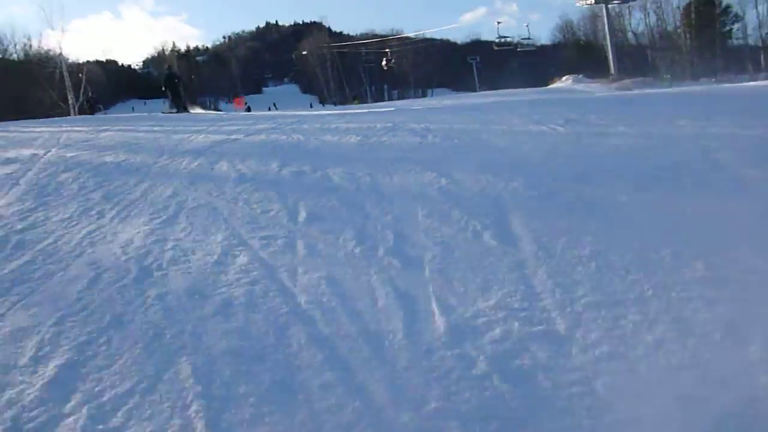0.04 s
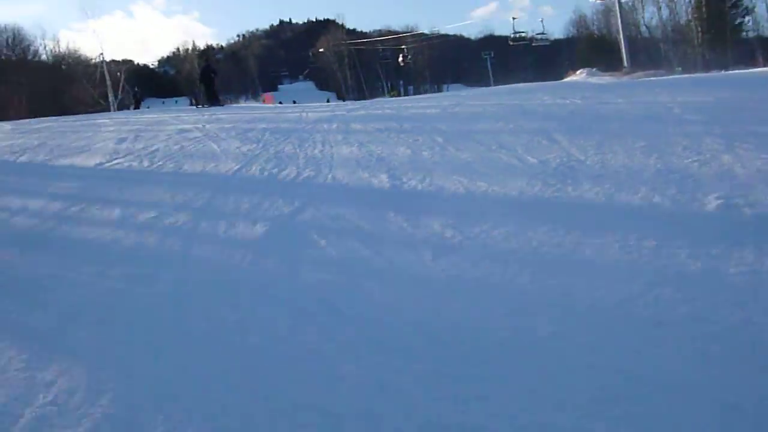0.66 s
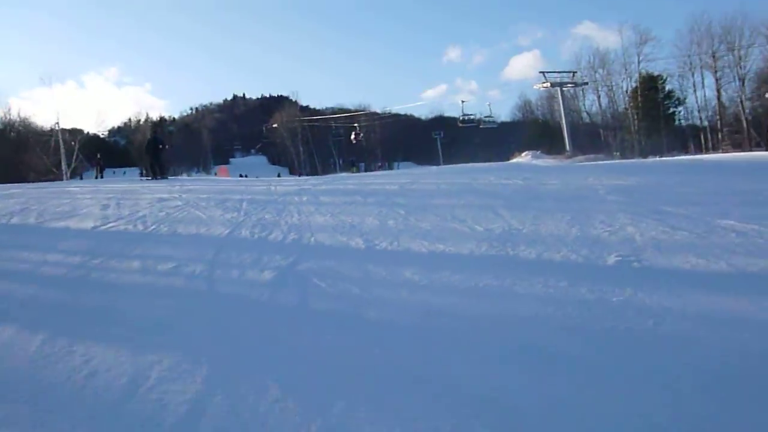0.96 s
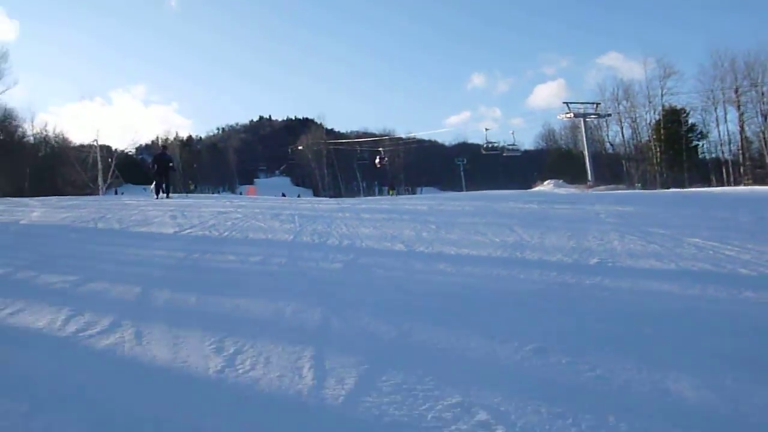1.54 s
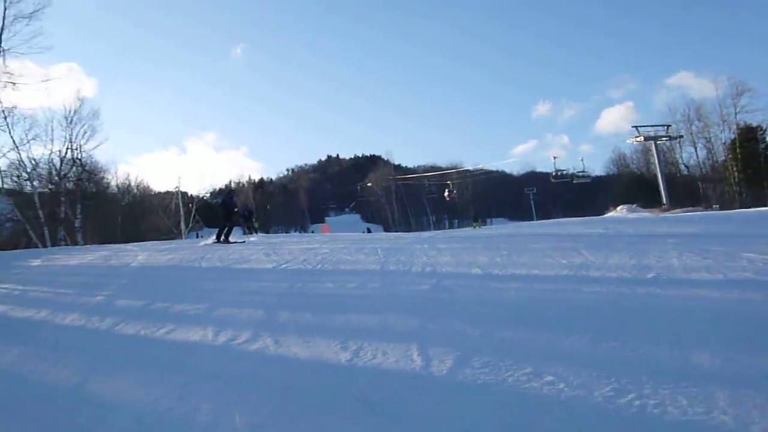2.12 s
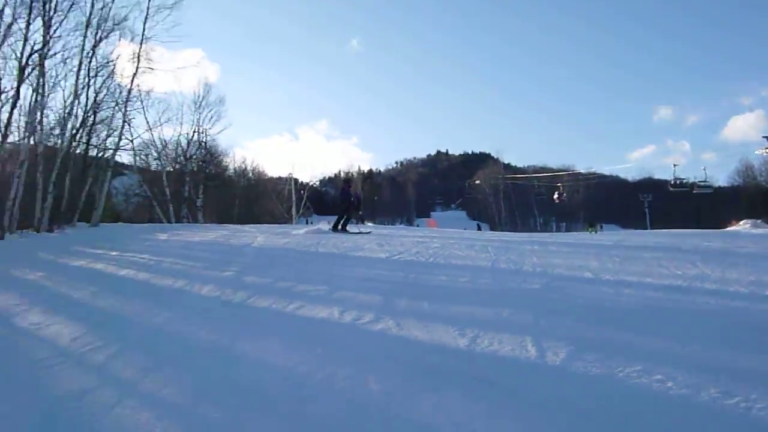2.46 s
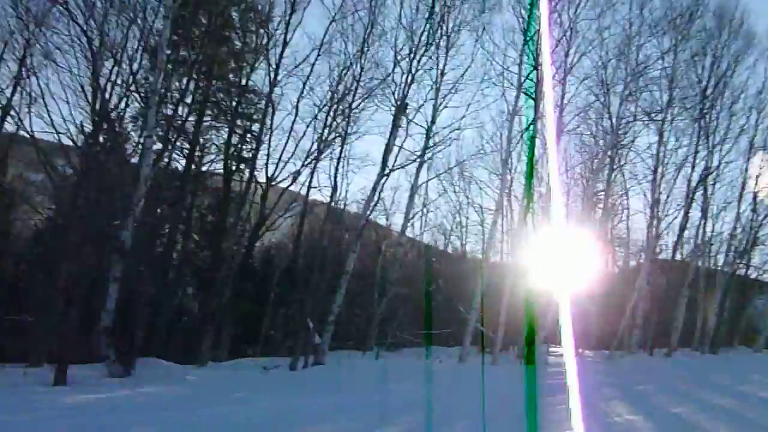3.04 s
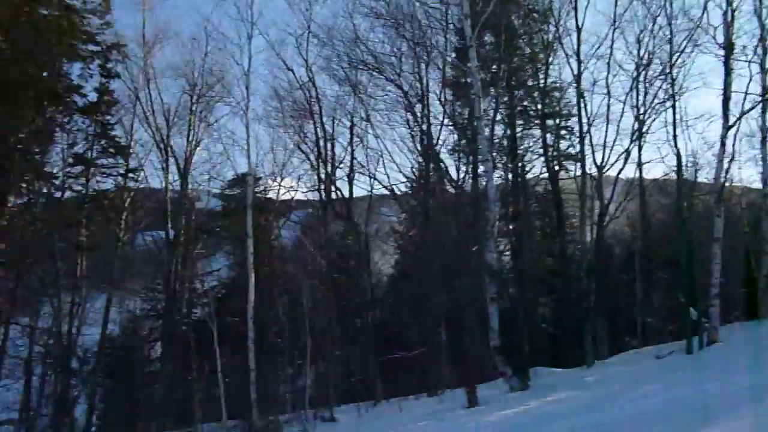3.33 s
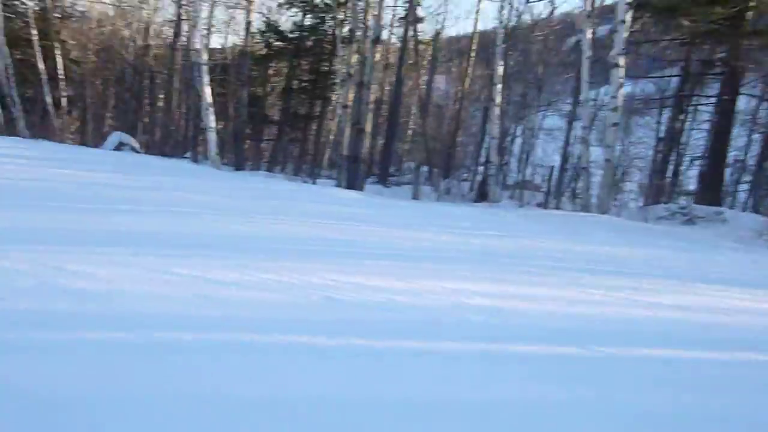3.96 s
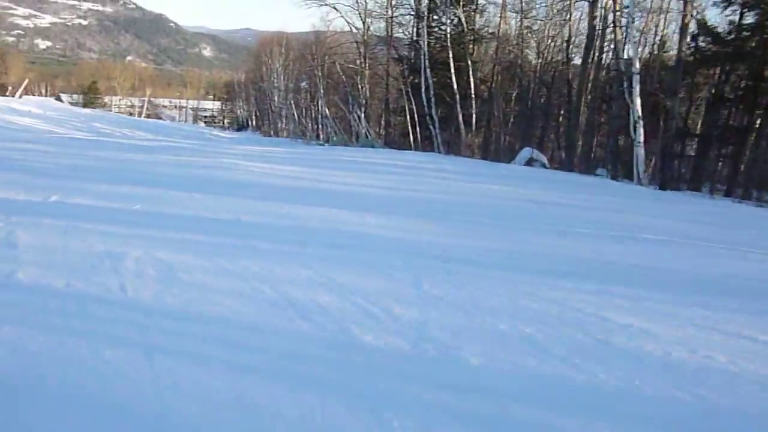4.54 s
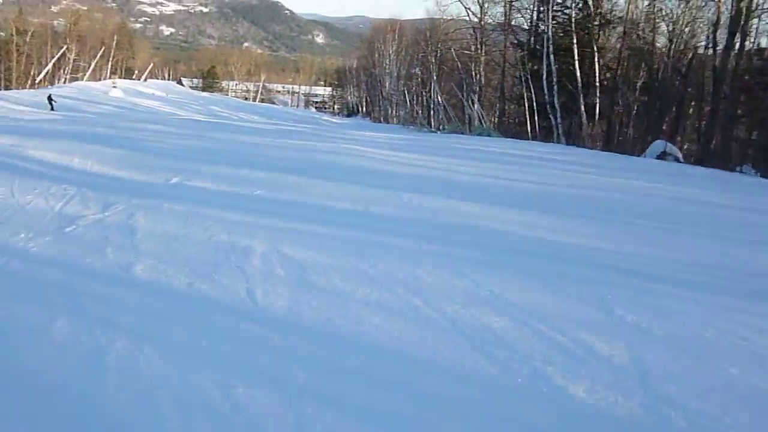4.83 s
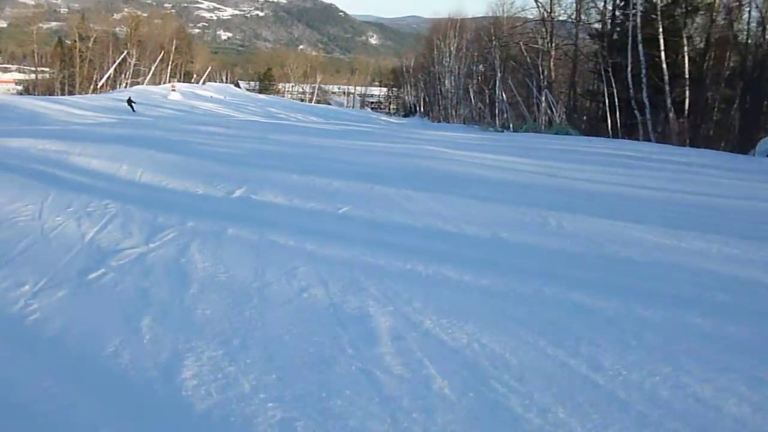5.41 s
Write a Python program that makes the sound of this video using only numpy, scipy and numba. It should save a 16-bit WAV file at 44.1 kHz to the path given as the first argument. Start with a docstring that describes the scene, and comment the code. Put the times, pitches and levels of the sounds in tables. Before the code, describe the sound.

A snowboard is already running fast over groomed snow, heard close from a microphone the rider carries, outdoors with no echo and slightly dull treble. For the first two and a half seconds, ridges drum steadily against the board and lumps give short low thuds, while the edge scrapes, crunches through crust and throws soft hisses of powder. A brief gritty rasp comes at about 1.3 seconds. From about 2.5 to 3.4 seconds the board glides more quietly. At about 3.6 seconds it bites into a turn with a louder, coarse scrape. From about 4.4 seconds to the end at 5.6, it skips, lands with hollow rattles and chatters over hard patches in quick runs of knocks, strongest around 5 seconds. Wind rumbles on the microphone throughout, with gusts near 0.2, 2.7 and 3.3 seconds and the heaviest around 4 seconds.

```python
"""On a groomed ski slope, a snowboard runs fast downhill, heard from a camera the rider carries.
Ridges of packed snow drum on the board and lumps thump it. The steel edge sticks and slips in a scrape,
crunches through crust and throws a hiss of powder. After a quiet glide the board bites into a turn, then
skips, lands and chatters over hard patches. Underneath, wind buffets the microphone."""
import sys
import numpy as np
from scipy import signal
from scipy.fft import rfft, irfft, next_fast_len
from scipy.io import wavfile
from scipy.ndimage import uniform_filter1d, map_coordinates
from numba import njit

SR = 44100
rng = np.random.default_rng(int(sys.argv[2]) if len(sys.argv) > 2 else 0)


def to_wav(sig):
    """Store sig (one row per channel, or 1-D mono) as 16-bit WAV at the path in sys.argv[1].

    Samples outside -1..1 are clipped; the rate is SR.
    """
    pcm = np.clip(np.atleast_2d(sig), -1, 1) * 32767
    pcm = np.round(pcm).astype(np.int16)
    wavfile.write(sys.argv[1], SR, pcm.T)  # frames by channels


N = 246210

# how far the board tips onto its edge: t/s, lean/0-1
LEAN = [(0, 0.58), (0.7, 0.24), (1.3, 0.47), (2.0, 0.52), (2.4, 0.27), (2.7, 0.3), (3.3, 0.63),
        (3.65, 0.85), (4.2, 0.88), (4.6, 0.87), (5.58, 0.91)]
# how hard the rider loads the board, driving scrape, crunch and powder: t/s, load/dB
LOAD = [(0.0, 1.5), (0.35, -1.8), (0.45, 1.5), (0.92, 0.5), (1.01, -1.5), (1.68, -2.5), (1.97, 0.2),
        (2.23, -1.9), (2.39, 3), (2.54, -5), (2.81, -5), (2.98, 0.2), (3.38, -4.5), (3.64, 3.5),
        (4.37, 1.5), (4.69, 2), (5.2, -2), (5.58, 1.2)]
# the board skips off a ridge and goes light: t/s, dip of the drumming/dB
HOPS = [(1.1, -2.5), (1.21, -3), (2.075, -1.5), (2.49, -3), (3.875, -4), (4.275, -6), (4.47, -1.5),
        (4.815, -5), (4.91, -0.5), (5.12, -8), (5.245, -9), (5.47, -6.5)]
# roughness of the groomed snow, the fader of the drumming: t/s, level/dB
ROUGHNESS = [(0.0, -25.5), (0.46, -25.5), (0.56, -24), (1.1, -25), (1.49, -26), (1.65, -30.5), (1.84, -25),
             (2.29, -28), (2.36, -24), (2.8, -32.5), (3.21, -27), (3.55, -31), (4.16, -30), (4.19, -27),
             (4.61, -32), (4.73, -24.5), (4.85, -33.5), (5.58, -35)]
# lumps that thump the board: t/s, level/dB, f/Hz, t60/s
BUMPS = [(0.028, -3.5, 265, 0.027), (0.156, -10, 298, .05), (.172, -11, 260, 0.048),
         (0.321, -9.5, 286, 0.14), (.468, -14, 231, 0.036), (.513, -6, 328, 0.062),
         (0.565, -5.5, 268, 0.067), (.617, -5, 275, 0.017), (0.675, -14, 273, 0.066),
         (0.734, -11, 337, .035), (.762, -15, 345, 0.044), (0.843, -9, 316, 0.026), (0.862, -7, 320, 0.025),
         (0.905, -8.5, 290, 0.055), (.95, -9, 305, 0.053), (1.04, -6.5, 263, 0.022),
         (1.14, -11, 298, 0.016), (1.165, -9, 240, 0.04), (1.467, -11, 257, 0.056),
         (1.849, -10.5, 260, 0.065), (1.923, -5, 327, 0.019), (2.01, -7, 292, 0.03),
         (2.395, -12.5, 380, 0.052), (2.456, -5.5, 263, 0.021), (2.55, -11, 348, 0.015),
         (2.963, -11, 283, 0.014), (3.157, -12.5, 324, 0.045), (3.189, -15, 302, 0.051),
         (3.22, -8, 303, 0.013), (3.269, -6.5, 318, 0.017), (3.321, -10.5, 192, 0.01),
         (3.69, -10, 310, 0.017), (3.817, -13, 250, 0.028), (3.942, -13.5, 310, 0.023),
         (4.184, -7, 218, 0.045), (4.227, -7.5, 218, 0.045), (4.315, -9.5, 247, 0.018),
         (4.367, -7.5, 276, 0.024), (4.411, -14, 271, 0.022), (4.767, -9, 274, 0.015),
         (4.78, -13, 290, 0.014), (4.98, -16, 248, .06), (5.045, -16, 172, .07), (5.181, -17, 304, 0.075),
         (5.283, -17.5, 159, 0.051), (5.551, -16.5, 271, 0.045)]
# modes of board and bindings: f/Hz, width/Hz, level running flat/dB, boost at full lean/dB
BOARD_MODES = [(154, 69, -12.5, 11.5), (463, 213, -5.5, 4), (610, 186, -4.5, 5.5), (883.5, 156, -1, 1.5),
               (1233, 136, -5.5, 1), (1460, 640, -12, -3)]
# the edge skids sideways: t/s, half-length/s, scrape boost/dB, grit level/dB
SKIDS = [(.55, 0.04, -0.5, -46), (1.281, .007, 6, -41), (1.313, 0.0087, 5, -38.5), (2.342, 0.022, 2, -46),
         (2.432, 0.026, 2, -50), (3.74, 0.14, 0.5, -39.5), (4.05, .12, 0.5, -44.5), (4.204, 0.022, -1, -40),
         (4.644, .012, 2, -45), (5.403, .02, 0, -46)]
# the edge catches on hard snow: t/s, length/s, level/dB, f/Hz, t60/s
CATCHES = [(0.119, .003, -13.5, 860, 0.016), (0.594, .003, -16, 860, .014), (0.983, .003, -13, 700, 0.018),
           (1.303, .022, -14, 980, 0.0085), (2.417, .003, -21, 800, 0.016), (2.549, .003, -14, 460, 0.017),
           (3.609, .003, -13, 990, 0.017), (3.666, .003, -16, 905, 0.024), (3.815, .02, -15.5, 555, 0.02),
           (3.885, .003, -15.5, 860, 0.02), (4.277, .003, -22, 980, .018), (4.461, .003, -10, 930, 0.015),
           (4.638, .003, -15.5, 985, 0.019), (4.685, .042, -17, 830, 0.017), (4.744, .014, -19, 774, 0.014),
           (4.843, .003, -13, 565, 0.01), (4.948, .012, -18.5, 892, 0.032), (5.029, .003, -15, 495, .008),
           (5.034, .01, -12, 570, 0.007), (5.048, .003, -6, 586, 0.023), (5.058, .021, -11, 598, .026),
           (5.292, .02, -16.5, 700, .01), (5.389, .02, -20.5, 880, 0.035), (5.415, .003, -7.5, 800, 0.017),
           (5.425, .003, -19, 900, 0.016), (5.475, .003, -14, 1220, 0.02)]
# the board comes down on hard patches: t/s, length/s, level/dB
LANDINGS = [(4.678, 0.085, -30), (4.837, 0.026, -26.5), (4.935, 0.032, -31.5), (5.025, 0.048, -30),
            (5.283, 0.028, -24)]
# hollow body of a landing: f/Hz, level/dB
LANDING_EQ = [(60, -33), (160, 2), (280, -4), (380, 0.5), (480, -2.5), (590, 2.5), (700, -11), (900, -9.5),
              (1200, -22), (2000, -36), (5000, -60)]
# crustiness of the snow, the fader of the crunch: t/s, level/dB
CRUST = [(0, -43.5), (0.7, -43), (1.5, -41.5), (2.0, -41), (2.55, -47.5), (3.0, -43), (3.35, -43.5),
         (3.8, -43), (4.15, -43), (4.4, -45), (5.58, -43.5)]
# plates of crust snap under the edge: t/s, level/dB, decay/s
CRACKS = [(.508, -42.5, .005), (0.571, -38, 0.0065), (.688, -41, 0.0053), (.85, -42, 0.017),
          (.903, -37, 0.015), (1.282, -38, 0.0046), (1.303, -43, 0.005), (1.315, -43, .007),
          (1.922, -36, 0.0031), (2.641, -44, 0.0046), (2.985, -52, .005), (3.478, -41.5, 0.012),
          (3.608, -43, .008), (3.669, -39, .008), (3.786, -42, 0.011), (3.82, -39, 0.011),
          (4.196, -48, 0.018), (4.522, -34.5, .004), (4.638, -41, 0.0039), (4.753, -43, 0.0032),
          (5.173, -42, .004), (5.476, -39, .003), (5.541, -40, 0.0027)]
# fine crust under a flat board: f/Hz, level/dB
FINE_CRUST_EQ = [(800, -14.5), (1650, 6.5), (2200, -10.5), (2850, 0.5), (3150, -0.5), (3700, 1), (4500, -8),
                 (6000, -15.5), (8000, -34)]
# coarse lumps under a leaning edge: f/Hz, level/dB
COARSE_CRUST_EQ = [(600, -9.5), (1100, 8.5), (1550, 9.5), (2000, 1), (2300, 2), (2800, 0.5), (3600, -7.5),
                   (4600, -18), (8000, -38.5)]
# plumes thrown up from soft patches: t/s, half-length/s, powder boost/dB
PLUMES = [(1.157, 0.036, 4.5), (1.454, 0.18, 1), (1.82, 0.12, 6.5), (2.298, 0.082, 7.5), (2.95, .2, 3),
          (4.2, 0.16, 4.5), (4.638, 0.023, 6), (5.13, 0.023, 4.5), (5.32, 0.32, 4.5)]
# hiss of sprayed powder: f/Hz, level/dB
POWDER_EQ = [(1500, -22.5), (3000, 0), (4200, 6), (5000, 1.5), (5900, 1.5), (7000, -4), (8000, -11.5),
             (9000, -15.5)]
# rasp of hard grit: f/Hz, level/dB
GRIT_EQ = [(800, -17), (1200, 1), (1800, 6), (2400, 0), (3500, -1), (4200, -5.5), (5200, -18.5),
           (8000, -33.5)]
# low wind rumble around 120 Hz; the 12 Hz point adds only inaudible drift: f/Hz, level/dB
LOW_END_EQ = [(12, 2.5), (28, -16), (42, -11), (75, -1.5), (120, 5), (200, -4.5), (400, -23), (1200, -75)]
# gusts on the microphone: t/s, half-length/s, level/dB
GUSTS = [(.24, 0.084, -44.5), (2.655, 0.058, -39.5), (3.27, 0.16, -40.5), (3.627, 0.025, -50),
         (3.988, 0.12, -36), (4.24, 0.045, -35)]
# deeper roar of a gust: f/Hz, level/dB
ROAR_EQ = [(20, -15), (42, -5), (80, -1), (130, 0), (200, -13.5), (400, -33.5), (1200, -80)]
# single eddies that slap the microphone: t/s, level/dB, f/Hz
SLAPS = [(.235, -31, 48), (3.215, -37, 42), (3.319, -32, 55)]


def drumming(flat_hz=295, lean_drop_hz=75, trim_db=0.94):
    """Snow ridges hit the base and keep the board's bending resonance booming, lower as it leans."""
    # the pitch wanders as the length of board on the snow changes
    hz = (flat_hz - lean_drop_hz * curve(LEAN)) * (1 + 0.084 * wander(rate=14))
    ridges = grains(rate=1500, scatter_db=0.5)
    boom = resonate(resonate(ridges, hz, width=177), hz, width=405)
    # a narrow board radiates little of its lowest motion
    boom = signal.sosfilt(signal.butter(4, 165, "high", fs=SR, output="sos"), boom)
    db = curve(ROUGHNESS) + trim_db + hop_dips_db() + 0.58 * wander(rate=35)
    return steady(boom, span_s=0.049) * undb(db)


def thumps(trim_db=-6.0):
    """Each larger lump flexes the whole board once: a short, low thud."""
    out = np.zeros(N)
    for s, db, hz, t60 in BUMPS:
        add(out, s, undb(db + trim_db) * ring(hz, t60, rise_s=0.003))
    return out


def scraping(base_db=-30.5, load_depth=0.87, hop_depth=0.48):
    """The edge sticks and slips; each slip rings the board's stiffer modes, most louder as it leans."""
    lean = curve(LEAN)
    slips = grains(rate=1300, scatter_db=2)
    body = np.zeros(N)
    for k, (hz, width, flat_db, lean_db) in enumerate(BOARD_MODES):
        body += (-1) ** k * undb(flat_db + lean * lean_db) * resonate(slips, hz, width)
    # snow packed against the edge damps the treble
    body = signal.sosfilt(signal.butter(4, 1900, fs=SR, output="sos"), body)
    skids_db = sum(db * swell(s, half_s) for s, half_s, db, _ in SKIDS)
    db = base_db + load_depth * curve(LOAD) + hop_depth * hop_dips_db() + skids_db
    return steady(body, span_s=0.059) * undb(db + 0.48 * wander(rate=60))


def chatter(slip_s=0.007, jitter=0.098, scatter_db=3.0, trim_db=-3.5):
    """On hard snow the edge grips and lets go in a quick run of knocks, or just once."""
    out = np.zeros(N)
    # every knock also jolts the board's low bending resonance
    flex = undb(-10) * ring(hz=255, t60=0.018, rise_s=0.00086)
    for s, length, db, hz, t60 in CATCHES:
        chance = np.clip(rng.standard_normal((16, 3)), -2, 2)
        delay = 0
        for gap, size, pitch in chance:
            if delay < length:
                knock = ring(hz * (1 + 0.015 * pitch), t60, rise_s=0.00056) + flex
                # knocks after the first grip are uneven and on average softer
                accent_db = scatter_db * size - 1.0 if delay > 0 else 0
                add(out, s + delay, -knock * undb(db + trim_db + accent_db))
            delay += slip_s * (1 + jitter * gap)
    return out


def landings(attack_s=0.0059, release_s=0.004):
    """The board comes down on hard snow and rattles hollowly over it for a moment."""
    t = np.arange(N) / SR
    contact = np.zeros(N)
    for s, length, db in LANDINGS:
        attack = np.clip((t - s) / attack_s, 0, 1)
        release = np.exp(-np.maximum(t - s - length, 0) / release_s)
        contact += undb(db) * attack * release
    rattle = colour(grains(rate=1100, scatter_db=2.0), LANDING_EQ)
    return contact * steady(rattle, span_s=0.015)


def crunch(spurts_db, load_depth=1.11):
    """Crust crumbles under the loaded edge; snapping plates add sharp accents that die quickly."""
    lean = curve(LEAN)
    fine = colour(grains(rate=2800, scatter_db=0.5), FINE_CRUST_EQ)
    # a leaning edge digs deeper and breaks off coarser, darker lumps
    coarse = colour(grains(rate=3500, scatter_db=3), COARSE_CRUST_EQ)
    crumble = np.sqrt(1 - lean ** 2) * fine + 1.42 * lean * coarse
    snaps = np.zeros(N)
    t = np.arange(SR // 2) / SR
    for s, db, decay_s in CRACKS:
        add(snaps, s, undb(db) * np.exp(-t / decay_s))
    return crumble * (undb(curve(CRUST) + load_depth * curve(LOAD) + spurts_db) + snaps)


def powder(spurts_db, base_db=-54.5, load_depth=0.42):
    """Crystals spray off the edge in a fine hiss that swells over soft patches."""
    plumes_db = sum(db * swell(s, half_s) for s, half_s, db in PLUMES)
    hiss = colour(grains(rate=12000, scatter_db=5.0), POWDER_EQ)
    return hiss * undb(base_db + load_depth * curve(LOAD) + plumes_db + spurts_db)


def grit():
    """Where the edge skids it shaves off hard grains: a bright, coarse rasp."""
    skid = sum(undb(db) * swell(s, half_s) for s, half_s, _, db in SKIDS)
    return skid * colour(grains(rate=1800, scatter_db=3), GRIT_EQ)


def wind(base_db=-47, lean_boost_db=5.5):
    """Eddies tumble over the microphone port and rumble, louder in the turn; gusts add a deeper roar."""
    low_end = steady(colour(rng.standard_normal(N), LOW_END_EQ), span_s=0.083)
    roar = steady(colour(rng.standard_normal(N), ROAR_EQ), span_s=0.042)
    gusts = sum(undb(db) * swell(s, half_s) for s, half_s, db in GUSTS)
    low_end_db = base_db + lean_boost_db * curve(LEAN) + 0.69 * wander(rate=19)
    return low_end * undb(low_end_db) + roar * gusts


def wind_slaps():
    """A large eddy pushes on the microphone port for a cycle or two: a sub-bass bump."""
    out = np.zeros(N)
    for s, db, hz in SLAPS:
        add(out, s, undb(db) * ring(hz, t60=0.047, rise_s=0.0053))
    return out


def hop_dips_db():
    """The level ducks as the skipping board loses contact with the snow."""
    return sum(db * swell(s, half_s=0.025) for s, db in HOPS)


def undb(db):
    """Decibels to gain."""
    return 10 ** (np.asarray(db) / 20)


def curve(table):
    """An automation curve through (t/s, value) points."""
    return np.interp(np.arange(N) / SR, *np.transpose(table))


def swell(s, half_s):
    """A bell-shaped envelope that peaks at 1 at s seconds."""
    return np.exp(-((np.arange(N) / SR - s) / half_s) ** 2)


def wander(rate):
    """Smooth random modulation through rate values a second; rms 1."""
    levels = rng.standard_normal(4096)
    place = np.arange(N) / SR * rate
    return unit(map_coordinates(levels, [place], order=2, mode="wrap"))


def grains(rate, scatter_db):
    """Tiny impacts of scattered size at random moments, about rate a second; rms 1."""
    struck = rng.random(N) < rate / SR
    size = undb(scatter_db * np.minimum(rng.standard_normal(N), 2))
    polarity = np.sign(rng.standard_normal(N))
    return unit(struck * size * polarity)


def ring(hz, t60, rise_s):
    """A damped sine with a softened attack; peak 1."""
    t = np.arange(SR // 10) / SR
    decay = np.exp(-np.log(1000) * t / t60)
    attack = 1 - np.exp(-t / rise_s)
    swing = np.sin(2 * np.pi * hz * t) * decay * attack
    return swing / np.abs(swing).max()


def colour(x, eq):
    """Shape x with an EQ curve of (f/Hz, level/dB) points; rms 1."""
    hz, db = np.transpose(eq)
    size = next_fast_len(N)
    bins = np.maximum(np.fft.rfftfreq(size, 1 / SR), 1)
    gain = undb(np.interp(np.log(bins), np.log(hz), db))
    return unit(irfft(rfft(x, size) * gain, size)[:N])


def resonate(x, hz, width):
    """One resonance, still or swept, with centre and width in Hz."""
    return svf(x + 1e-18, hz * np.ones(N), float(width))


@njit
def svf(x, hz, width):
    """State-variable band-pass with a moving centre, gain 1 there."""
    y, band, low = np.empty(len(x)), 0., 0.
    for i in range(len(x)):
        g, damping = np.tan(np.pi * hz[i] / SR), width / hz[i]
        v = (band + g * (x[i] - low)) / (1 + g * (g + damping))
        band, low = 2 * v - band, low + 2 * g * v
        y[i] = damping * v
    return y


def steady(x, span_s):
    """Ride the rms to 1 over about span_s, keeping the faster flutter."""
    size = max(int(span_s * SR), 2)
    power = uniform_filter1d(uniform_filter1d(x ** 2, size), size)
    return x / np.sqrt(np.maximum(power, 1e-12))


def unit(x):
    """Scale to rms 1."""
    return x / np.sqrt(np.mean(x ** 2))


def add(out, s, sound):
    """Mix a sound in at s seconds."""
    start = int(np.clip(s * SR, 0, N))
    out[start:start + len(sound)] += sound[:N - start]


def scene():
    """Board, snow and wind in the open air: a mono mix with no echo."""
    board = drumming() + scraping()
    spurts_db = 0.79 * wander(rate=100)  # crust and powder leave the edge in the same small spurts
    spray = crunch(spurts_db) + powder(spurts_db)
    hits = thumps() + chatter() + landings()
    air = wind() + wind_slaps()
    return (board + spray + hits + air + grit())[None]


def record(dry, ceiling=0.5, dull_hz=6900, top_hz=8400):
    """The small camera rounds the highest peaks, dulls the treble and cuts the top."""
    rounded = ceiling * np.tanh(dry / ceiling)
    dulled = signal.sosfilt(signal.butter(6, dull_hz, fs=SR, output="sos"), rounded)
    return signal.sosfilt(signal.ellip(8, 0.2, 80, top_hz, fs=SR, output="sos"), dulled)


dry = scene()
out = record(dry)
to_wav(out)
```